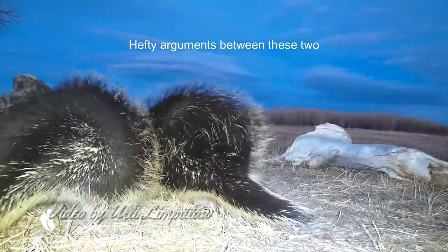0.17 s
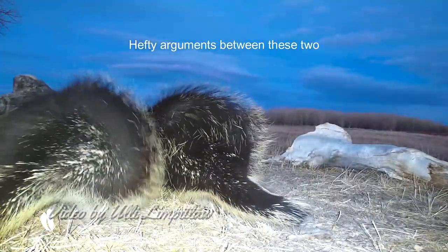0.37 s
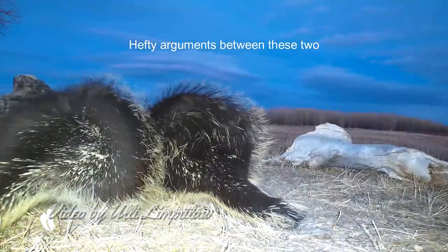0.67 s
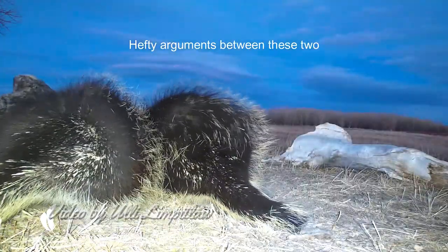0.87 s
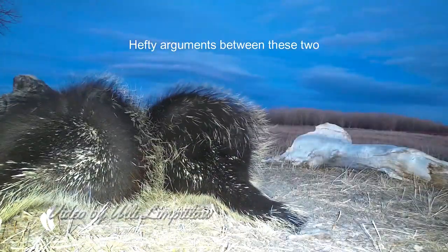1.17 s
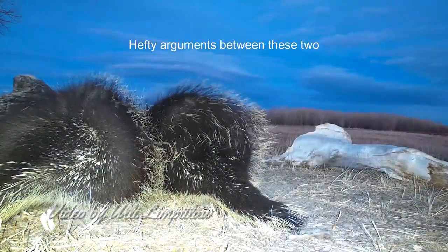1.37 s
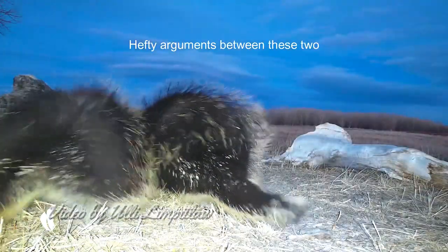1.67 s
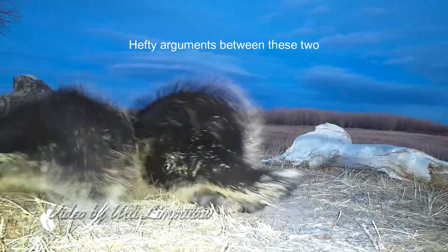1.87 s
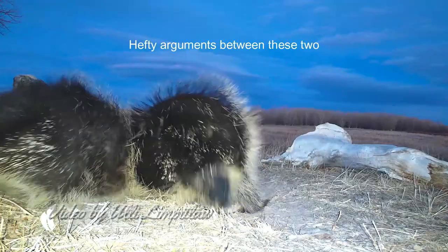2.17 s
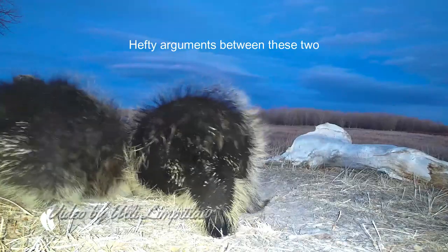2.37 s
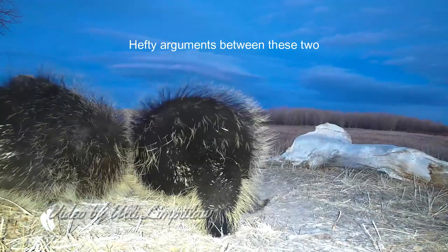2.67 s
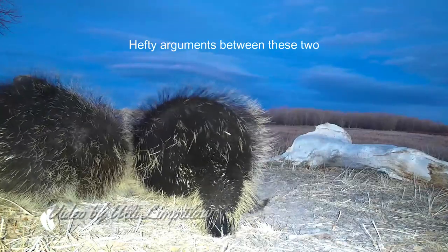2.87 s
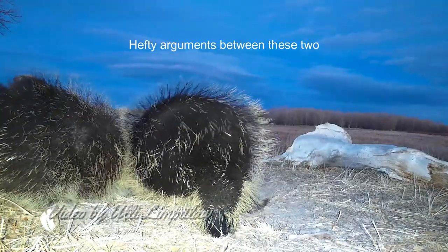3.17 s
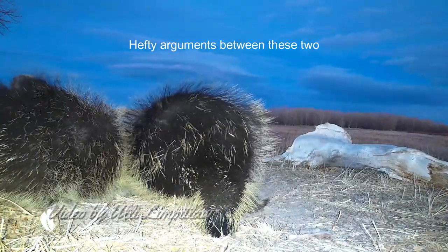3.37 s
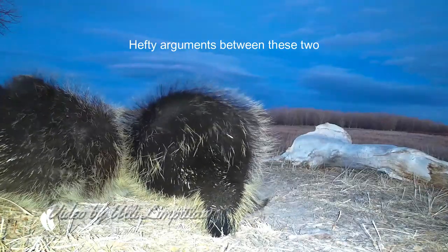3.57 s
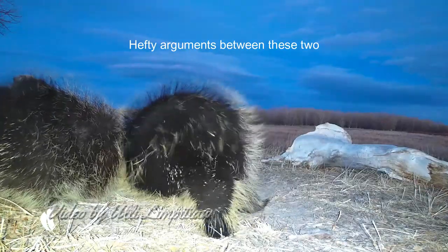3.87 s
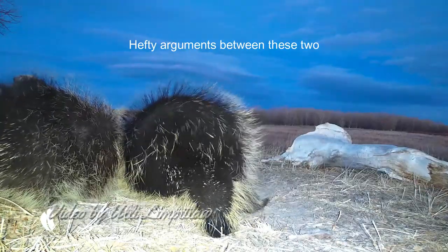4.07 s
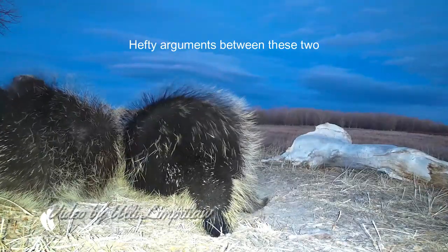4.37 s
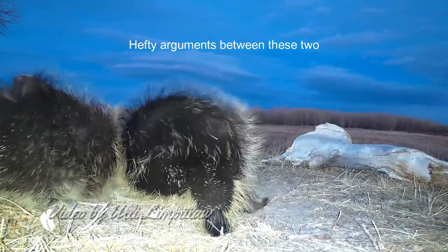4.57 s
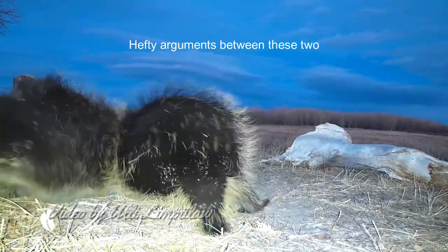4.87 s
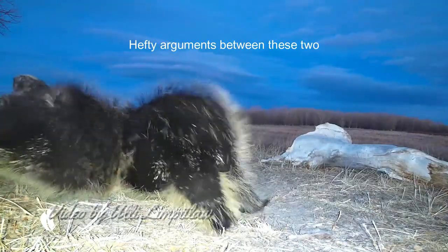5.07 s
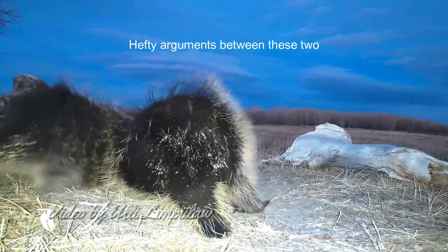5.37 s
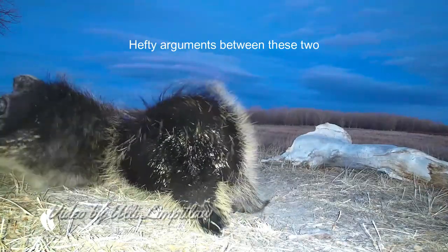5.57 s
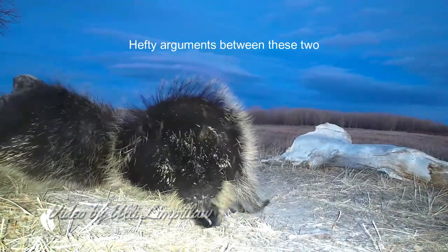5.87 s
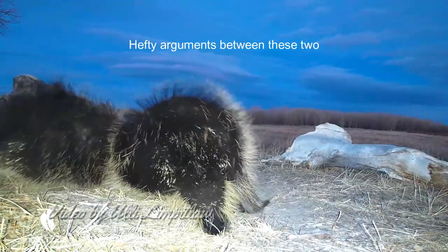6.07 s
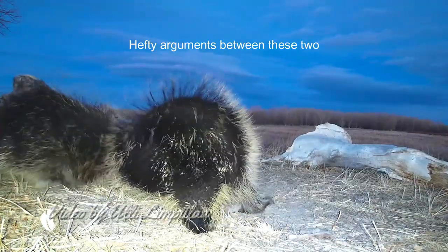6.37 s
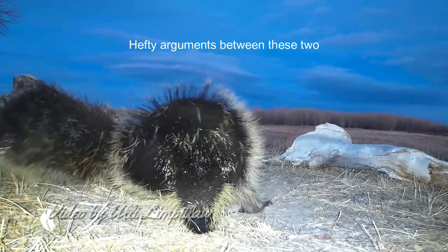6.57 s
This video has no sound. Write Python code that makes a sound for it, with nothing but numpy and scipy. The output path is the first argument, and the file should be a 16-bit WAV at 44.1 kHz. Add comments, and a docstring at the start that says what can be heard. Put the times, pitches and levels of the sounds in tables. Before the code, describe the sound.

Two porcupines quarrel close to an outdoor microphone. A low groan is already fading at the start; after a pause come squeals that plunge within a fraction of a second into rough, nasal groans, with a short extra groan late on. Deep wind swells, slams and thumps buffet the microphone, with small cracks and faint straw rustles. Dry open air, no echo.

```python
"""In the open, on straw, two porcupines quarrel: most calls start as a high squeal that drops fast into
a low groan, and two are groans alone. Voices are sums of overtones weighted by vocal-tract resonances.
Wind buffets the microphone with deep swells, slow slams and short thumps, made of coloured noise and pulses.
Ticks and cracks are decaying steps; two straw rustles and a sharp burst as the last squeal lands are grainy
noise; two faint tones and a hiss lie beneath."""
import sys
import numpy as np
from scipy import signal
from scipy.fft import rfft, irfft, next_fast_len
from scipy.io import wavfile
from scipy.ndimage import uniform_filter1d, map_coordinates

SR = 44100
rng = np.random.default_rng(int(sys.argv[2]) if len(sys.argv) > 2 else 0)


def dump_mix(stems):
    """Bounce the given channels to the path in sys.argv[1] as a 16-bit WAV at rate SR."""
    frames = np.atleast_2d(stems).T  # one column per channel
    limited = np.clip(frames, -1, 1)  # hard clip at full scale
    pcm = np.round(limited * 32767).astype(np.int16)
    wavfile.write(sys.argv[1], SR, pcm)


def volts(x):
    """Linear amplitude factor 10**(x/20) for a level x in dB, scalar or array-like."""
    e = np.asarray(x, float) / 20
    return 10 ** e


N = 296793  # length in samples


def unit(x):
    """Normalization: a signal divided by its root mean square has rms 1."""
    return x / np.sqrt(np.mean(x ** 2) + 1e-20)


def wobble(rate, size=N):
    """Band-limited randomness: a smooth curve through random knots, rate of them a second."""
    knots = rng.standard_normal(int(size * rate / SR) + 4)
    return map_coordinates(knots, [np.arange(size) * rate / SR])


def noise(spectrum):
    """Spectral shaping: white noise filtered by (Hz, relative dB) points, then scaled to rms 1."""
    size = next_fast_len(N + 8192)
    point_hz, point_db = np.transpose(spectrum)
    hz = np.fft.rfftfreq(size, 1 / SR) + 0.12  # keeps the logarithm finite at 0 Hz
    gain = volts(np.interp(np.log(hz), np.log(point_hz), point_db))
    return unit(irfft(rfft(rng.standard_normal(size)) * gain, size)[:N])


# Spectrum of the preamplifier hiss. Each row: frequency in Hz, relative density in dB.
HISS_SPECTRUM = [(880, -2), (1500, -1), (4820, -6.5), (13900, -8), (15600, -12)]


def hiss():
    """Stationary noise: the hiss of the preamplifier has a fixed spectrum and level."""
    return volts(-62) * noise(HISS_SPECTRUM)


def hum():
    """Superposition of sinusoids: two faint tones with slightly wandering phase swell and fade."""
    t = np.arange(N) / SR
    upper = np.sin(2 * np.pi * 378 * t + .5 * wobble(6.2))
    lower = 0.79 * np.sin(2 * np.pi * 323 * t + .5 * wobble(6.4))
    return volts(-58) * np.exp(-((t - 1.15) / 0.53) ** 4) * (upper + lower)


# Strength of the wind on the microphone. Each row: time in seconds, swell level in dB.
WIND_STRENGTH = [(0.0, -17), (0.26, -7.5), (0.34, -22.5), (0.43, -7), (0.56, -27), (0.94, -25.5),
                 (0.99, -8), (1.25, -30.5), (2.21, -16), (2.42, -35), (2.66, -11.5), (2.72, -18.5),
                 (2.81, -6.5), (3.0, -31.5), (3.18, -5), (3.24, -13.5), (4.11, -29), (4.14, -10),
                 (4.29, -21), (4.37, -5), (4.48, -19), (5.04, -13), (5.16, -38), (5.19, -18), (6.73, -32)]
# Spectrum of the deep swells. Each row: frequency in Hz, relative density in dB.
SWELL_SPECTRUM = [(2.4, -47.5), (4.0, 7), (22, -1.5), (30, -6.5), (70, -22.5), (91, -31.5), (150, -120)]
# Spectrum of the smoother rush. Each row: frequency in Hz, relative density in dB.
RUSH_SPECTRUM = [(24, -25.5), (40, -3), (113, -15), (325, -25), (413, -28.5), (2500, -54), (3250, -75),
                 (5500, -120)]


def wind():
    """Turbulent pressure: deep swells shake the diaphragm; lumpy flutter grows with them over a smoother rush."""
    t = np.arange(N) / SR
    s, swell_db = np.transpose(WIND_STRENGTH)
    swell_db = np.interp(t, s, swell_db)
    rise = np.minimum(t / .01, 1)
    swell = rise * volts(swell_db) * noise(SWELL_SPECTRUM)
    lumps = volts(2.6 * wobble(14) + 1.6 * wobble(40))
    grain = noise([(35, -70), (50, 1.5), (150, -0.5), (400, -35.5), (900, -71.5)])
    flutter = volts(-36.5 + 0.53 * swell_db) * unit(lumps * grain)
    rush = volts(-40 + 0.09 * swell_db + 0.34 * wobble(4.03)) * noise(RUSH_SPECTRUM)
    return swell + flutter + rush


# Gusts that slam the diaphragm. Each row: time of the middle in seconds, peak pressure,
# time from greatest pull to greatest push in seconds.
GUST_SLAMS = [(.235, .6, 0.034), (.447, .4, 0.034), (1.016, .7, .024), (3.192, .55, .03),
              (4.164, 0.48, 0.024), (4.56, .4, .025), (5.025, .4, .025)]


def slams():
    """Diaphragm displacement: each hard gust gives one slow swing, a pull and then a push."""
    t = np.arange(N) / SR
    out = np.zeros(N)
    for s, peak, half_cycle in GUST_SLAMS:
        u = 2 * (t - s) / half_cycle
        out += peak * u * np.exp(.5 - u ** 2 / 2)  # extremes of -peak and +peak at u = -1 and 1
    return out


# Strong thumps of air. Each row: time in seconds, height of the pointed part (+ push, - pull)
# before rebound and turbulence are added.
AIR_THUMPS = [(0.4355, 0.13), (.477, .12), (1.8522, 0.13), (2.6663, -0.16), (2.6746, 0.15), (2.8332, -0.77),
              (3.2019, -0.51), (4.2437, -0.31), (4.3345, -0.24), (4.3503, -0.47), (4.3998, -0.55),
              (4.4314, 0.29), (4.6511, -0.19), (4.6976, -0.59), (4.7125, -.15), (4.7345, .2),
              (5.0295, 0.18), (5.8481, 0.13), (6.109, -0.2), (6.1343, 0.2), (6.1543, -0.25)]


def thumps():
    """Pressure impulse: a puff gives one pointed push or pull, a slower rebound and a little turbulence."""
    before = SR // 50
    out, t = np.zeros(N + SR), np.arange(-before, SR // 10) / SR
    turbulence = noise([(60, -64), (100, 26.0), (350, 3.0), (1000, -27.0), (3000, -73)])
    for s, peak in AIR_THUMPS:
        i = round(s * SR) - before
        point = 2 - 0.93 * abs(peak)  # harder puffs have a sharper tip
        push = np.exp(-np.abs(t / .002) ** point)
        rebound = .5 * np.exp(-((t - .006) / 0.0036) ** 2)
        rough = .2 * np.exp(-(t / 0.011) ** 2) * turbulence[i:][:len(t)]
        out[i:][:len(t)] += peak * (push - rebound + rough)
    return out[:N]


# Ticks and cracks: sudden steps; those at 2.8317 and 2.834 s are the crack of a hard thump.
# Each row: time in seconds, height of the step in dB.
SUDDEN_STEPS = [(0.2408, -20.7), (0.3356, -29.2), (2.8317, -33), (2.834, -31), (2.838, -35.5),
                (2.8673, -35), (2.9402, -32.7), (3.2029, -21.1), (3.3173, -32), (4.3605, -27.7),
                (4.4912, -36.5)]


def ticks_and_cracks():
    """Exponential relaxation: sudden small steps in the signal die away within milliseconds."""
    out, t = np.zeros(N + SR), np.arange(SR // 20) / SR
    for s, db in SUDDEN_STEPS:
        out[round(s * SR):][:len(t)] += volts(db) * np.exp(-t / 0.003)
    return out[:N]


# Short noise bursts: two straw rustles, and a sharp burst as the last squeal lands. Each row: time of the
# middle in seconds, peak of the envelope in dB before the grain, half-length in seconds.
BURST_TIMES = [(2.722, -59, 0.02), (2.785, -63, .01), (6.128, -53, .006)]


def noise_bursts():
    """Amplitude modulation: short bell-shaped envelopes cut bursts from grainy, band-limited noise."""
    t = np.arange(N) / SR
    envelope = sum(volts(db) * np.exp(-((t - s) / width) ** 2) for s, db, width in BURST_TIMES)
    grain = volts(3 * wobble(370))
    return grain * envelope * noise([(1200, -40), (2200, -1), (5500, -8), (8000, -38)])


def controls(groan, squeal, levels, chest_db):
    """Vocal-fold tension sets pitch: curves of a groan and of the squeal that may fall into it."""
    s, *columns = np.transpose(groan)
    start = squeal[0] if squeal else s[0]
    t = np.arange(round(start * SR), round(s[-1] * SR)) / SR
    pitch, effort_db, mouth_hz, bright_db = (np.interp(t, s, column) for column in columns)
    treble_db = effort_db + bright_db
    # the chest tone takes a share of the changes in effort
    chest_db = -46 + chest_db + 0.35 * (effort_db - effort_db.mean())
    if squeal:
        start, top_hz, drift, hold, turn = squeal
        mouth_rise, mouth_db, mouth_change, treble_rise, high_db, high_change = levels
        fall_speed, landing = 34, .14  # octaves/s, octaves: the folds go slack at one speed, settle softly

        def soft_max(a, b, width):
            """Smooth maximum: the larger of two curves, with a rounded corner."""
            return width * np.logaddexp(a / width, b / width)

        def onset_db(rise):
            """Gradual onset: the level climbs 23 dB over the rise time."""
            return -23 * np.cos(np.pi / 2 * np.minimum(u / rise, 1)) ** 2

        def join(squeal_db, groan_db, speed=1):
            """Release: once the pitch has landed, the squeal dies down to the level of the groan."""
            return np.where(u < landed, squeal_db, np.maximum(squeal_db + speed * release_db, groan_db))

        u = t - start
        fallen = soft_max(0, fall_speed * (u - hold), turn)  # octaves
        octave = np.log2(top_hz) + drift * u - fallen
        landed = u[np.argmax(octave < np.log2(pitch))]
        release_db = -580 * np.maximum(u - landed, 0)  # 580 dB/s
        fallen = np.minimum(fallen, fall_speed * (landed - hold))
        pitch = 2 ** soft_max(octave, np.log2(pitch), landing)
        effort_db = join(mouth_db + mouth_change * fallen + onset_db(mouth_rise), effort_db)
        treble_db = join(high_db + high_change * fallen + onset_db(treble_rise), treble_db)
        squeal_chest_db = -38 + .8 * onset_db(max(mouth_rise, treble_rise))
        chest_db = join(squeal_chest_db, chest_db, speed=.35)  # the chest tone dies more slowly
    curves = (pitch, effort_db, mouth_hz, treble_db - effort_db, chest_db)
    return t, [uniform_filter1d(curve, 300) for curve in curves]


def resonance(hz, centre_hz, width_hz):
    """Damped resonator: complex response of one resonance, 1 at its centre."""
    return 1j * hz * width_hz / (centre_hz ** 2 - hz ** 2 + 1j * hz * width_hz)


# Second and third resonance of the throat. Each row: centre in Hz, width in Hz before squaring.
UPPER_THROAT = [(4500, 725), (6100, 1180)]


def call(t, curves, posture):
    """Source-filter principle: overtones of vocal pulses, each weighted by the tract at its own frequency."""
    jitter, breath = .008, .45  # relative pitch waver, strength of the blur
    throat_hz, *upper_db, shimmer_db = posture
    pitch, effort_db, mouth_hz, bright_db, chest_db = curves
    low = np.clip(250 / pitch, 0, 1) ** 2  # 1 in the slack-fold groan, smaller in the squeal
    waver = wobble(60, size=len(t)) + 1.2 * (1 - low) * wobble(300, size=len(t))
    phase = 2 * np.pi * np.cumsum(pitch * (1 + jitter * waver)) / SR
    coarse = slice(None, None, 32)  # the tract is computed at every 32nd sample
    k = np.arange(1, 66)[:, None]
    hz = k * pitch[coarse]

    def level(part):
        """Power density: one gain per call, so an overtone still swells as it crosses a resonance."""
        power = np.sum(np.abs(part) ** 2, axis=0) / 2
        return part * np.sqrt(hz[0] / np.median(hz[0] * power))

    # squared resonances have steep skirts and leave dark valleys; the nose adds a weaker one
    nose = volts(-13.0) * resonance(hz, 1290, 640) ** 2
    mouth = resonance(hz, mouth_hz[coarse], 315) ** 2 - nose
    upper = resonance(hz, throat_hz, 666) ** 2
    for sign, db, (centre_hz, width_hz) in zip((-1, 1), upper_db, UPPER_THROAT):
        upper = upper + sign * volts(db) * resonance(hz, centre_hz, width_hz) ** 2
    chest = np.sqrt(2) / k ** 1.14 / (1 + 1j * (hz - hz[0]) / 600) ** 2
    tract = volts(effort_db[coarse]) * (level(mouth) + volts(bright_db[coarse]) * level(upper))
    tract = tract + volts(chest_db[coarse]) * chest
    # single pulses differ in sharpness, so highs vary most
    uneven_db = shimmer_db * (.4 + low) * wobble(130, size=len(t))
    voice = np.zeros(len(t))
    for n, row in zip(k[:, 0], tract * (hz < 10500)):
        height = n * pitch / 4000
        # turbulent air blurs high overtones
        blur = 1 + breath * (0.34 + low) * height * wobble(260, size=len(t))
        gain = np.interp(t, t[coarse], row.real) + 1j * np.interp(t, t[coarse], row.imag)
        voice += blur * volts(uneven_db * (.5 + height)) * np.real(gain * np.exp(1j * n * phase))
    since_start = t - t[0] + (t[0] == 0)  # a call under way at time 0 has no fade-in
    edge = np.clip(np.minimum(since_start, t[-1] - t) / 0.0032, 0, 1)
    return voice * edge


# The groan of each call, a list of rows. Each row: time in seconds, pitch in Hz, effort in dB,
# mouth resonance in Hz, brightness (treble over effort) in dB.
GROAN_CURVES = [
    [(0, 149.2, -52, 1510, -12.5), (.09, 144, -56, 1480, -14), (.125, 137, -64, 1450, -9),
     (0.2, 134.5, -57, 1420, -10.5), (0.3, 142.4, -62.5, 1380, -9), (0.4, 146, -52, 1350, -17),
     (0.465, 147, -60, 1350, -19)],
    [(1.65, 157.2, -47, 1600, -18), (1.69, 167.4, -42.5, 1660, -21.5), (1.76, 179, -43.5, 1710, -15.5),
     (1.81, 168.8, -44, 1730, -30), (1.87, 141, -48.5, 1580, -20), (1.94, 150.8, -45.5, 1590, -15),
     (1.99, 178.9, -44.5, 1550, -23), (2.04, 173.6, -51, 1405, -18), (2.1, 147.5, -51.5, 1410, -28),
     (2.25, 157.8, -51.5, 1403, -11), (2.325, 150.8, -61.5, 1449, -13)],
    [(3.74, 189.2, -56, 1300, -8), (3.79, 199.6, -55.5, 1240, -14), (3.83, 196.3, -50, 1350, -18),
     (3.88, 185.7, -59.5, 1330, -12), (3.98, 180.6, -72, 1340, -4)],
    [(4.73, 146, -44, 1550, -2.5), (4.775, 146.8, -46.5, 1550, -14), (4.81, 146.8, -45.5, 1610, -7),
     (4.87, 151.1, -46.5, 1520, -12), (4.95, 173.2, -43, 1620, -13), (5.0, 163.4, -47, 1727, -24),
     (5.06, 157.2, -47.5, 1742, -20), (5.105, 141.6, -55, 1460, -17), (5.142, 139, -47, 1440, -15)],
    [(5.18, 175.2, -59, 1540, -13), (5.22, 164.3, -52, 1422, -21), (5.265, 176.8, -56, 1520, -14),
     (5.3, 163.8, -53, 1450, -10.5), (5.4, 156, -64, 1400, -13)],
    [(6.17, 174, -53, 1500, -6), (6.23, 186.8, -53.5, 1490, -15), (6.28, 202, -58, 1350, -21),
     (6.37, 194.4, -59.5, 1340, -18), (6.45, 185.3, -69, 1585, -8)],
]
# drift in octaves per second, hold in seconds, roundness of the turn in octaves.
SQUEAL_PITCHES = [None, (1.488, 815, 7.2, .026, .25), (3.597, 875, -3.2, .04, .15),
                  (4.601, 738, .6, .034, .11), None, (6.02, 1015, -4.5, .047, .2)]
# per octave fallen, treble rise in seconds, treble level in dB, its change in dB per octave fallen.
SQUEAL_LOUDNESS = [None, (.052, -38.5, -.4, .054, -32.5, -6.3), (.03, -36.5, 2.6, .009, -29, -1.1),
                   (.015, -30, -4.7, .046, -22.5, -7.6), None, (.012, -35, -3, .009, -38, -5.6)]
# Chest tone of each groan, one entry per call: level in dB over the usual.
CHEST_LEVELS = [-5, -.5, -1, 1.5, -3, 0.5]
# Throat of each call. Each row: first resonance in Hz, second and third resonance in dB relative to
# the first, basic unevenness of pulses in dB.
THROAT_POSTURES = [(3200, 4, -14, 1), (3250, -8, -20, 1.2), (3400, -3, -17, 1.2), (3550, -2, -24, .9),
                   (3500, 0, -16, .8), (3400, -10, -13, 2)]


def porcupines():
    """Phonation: the two animals call in turn, each call with its own fold tension and throat posture."""
    out = np.zeros(N)
    calls = zip(GROAN_CURVES, SQUEAL_PITCHES, SQUEAL_LOUDNESS, CHEST_LEVELS, THROAT_POSTURES)
    for groan, squeal, levels, chest_db, posture in calls:
        t, curves = controls(groan, squeal, levels, chest_db)
        out[round(t[0] * SR):][:len(t)] += call(t, curves, posture)
    return out


def scene():
    """Linear superposition: hiss, hum, wind, noise bursts and voices add up."""
    background = hiss() + hum() + wind() + slams() + thumps()
    return (background + noise_bursts() + porcupines())[None]


def roll_off(x):
    """The treble ends steeply here."""
    return signal.sosfilt(signal.butter(12, 15780, fs=SR, output="sos"), x)


def record(dry):
    """Hard limiting: the strongest swells hit the top of the input stage; ticks and cracks are added after it."""
    top = .92  # of full scale
    mix = np.clip(dry, -top, top) + ticks_and_cracks()
    return roll_off(mix)


dry = scene()
out = record(dry)
dump_mix(out)
```